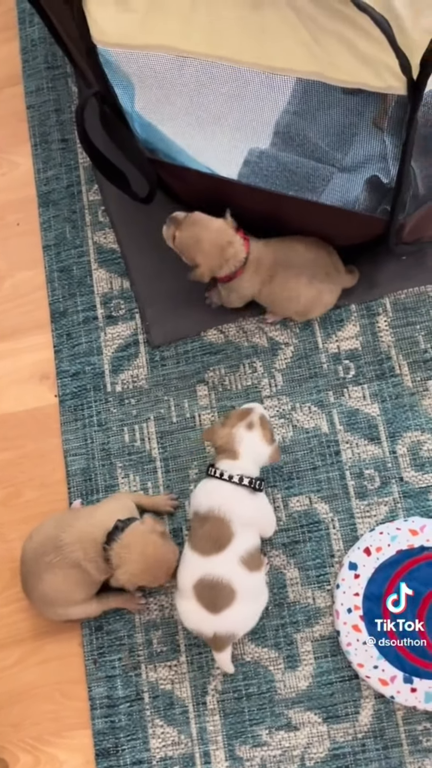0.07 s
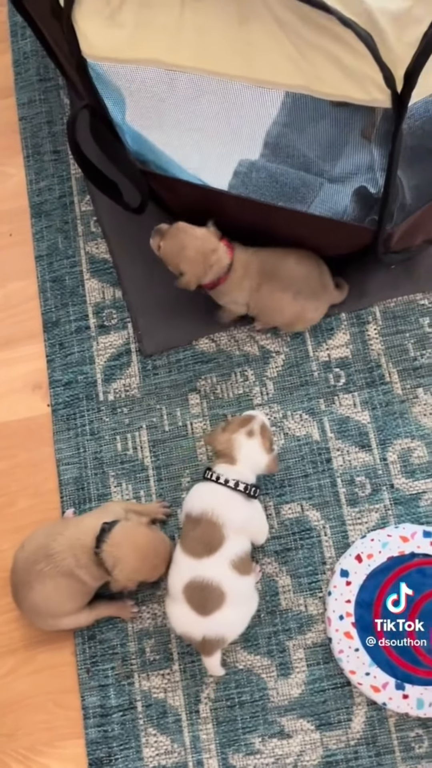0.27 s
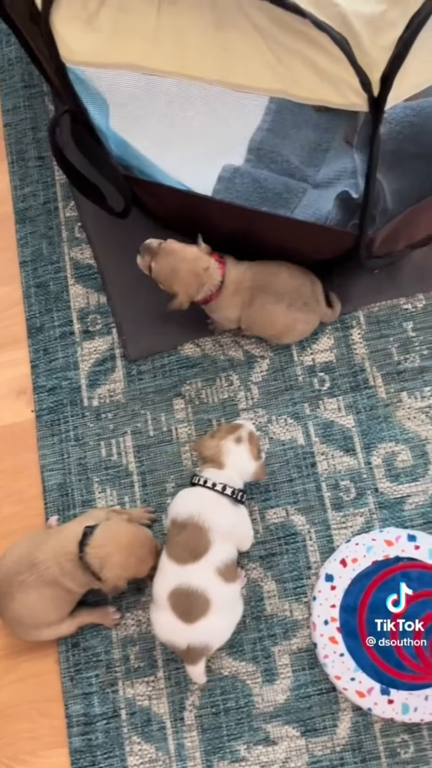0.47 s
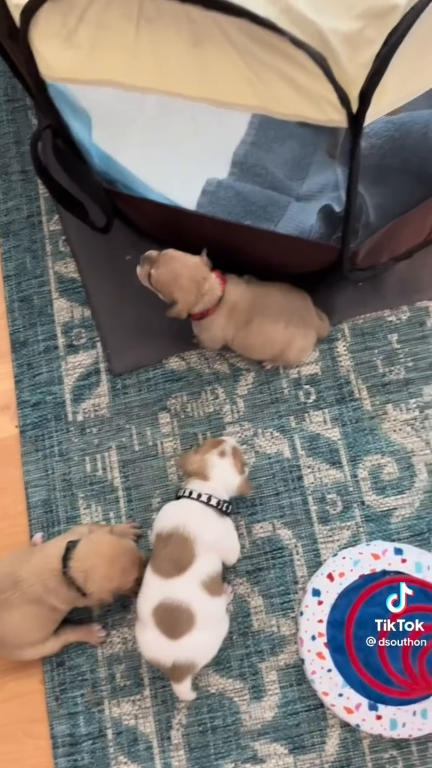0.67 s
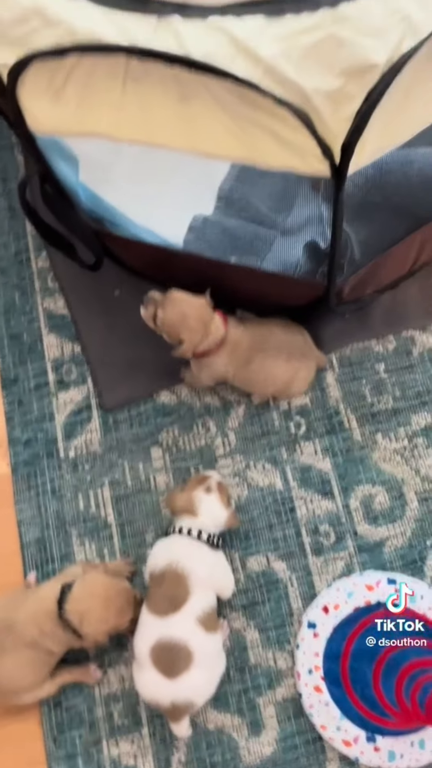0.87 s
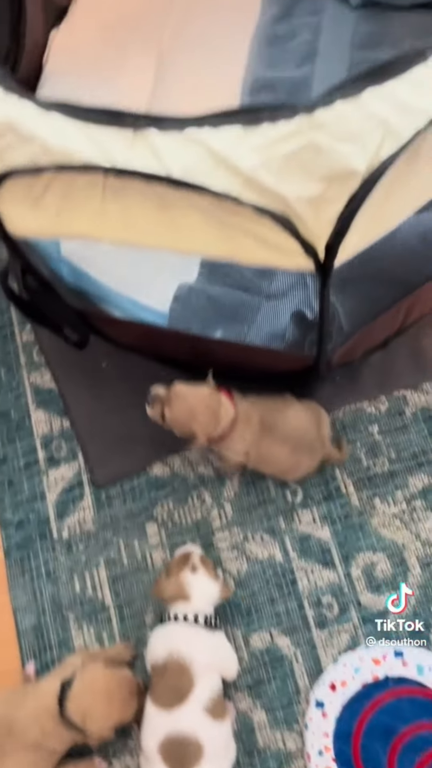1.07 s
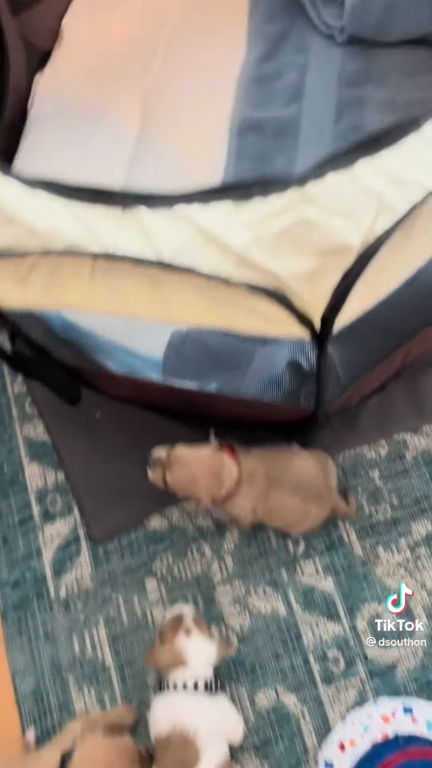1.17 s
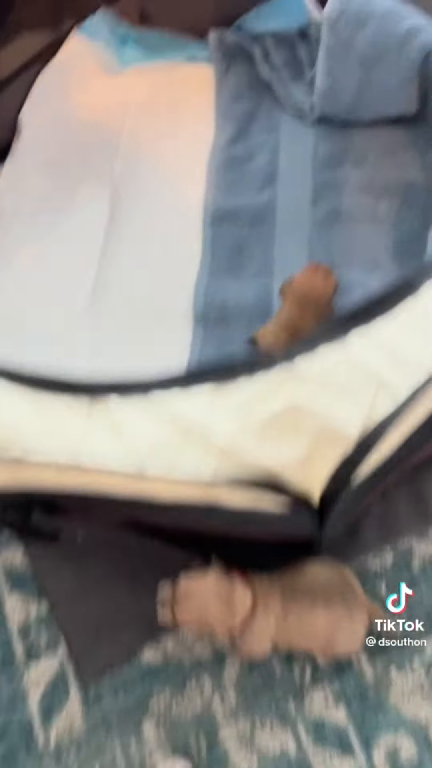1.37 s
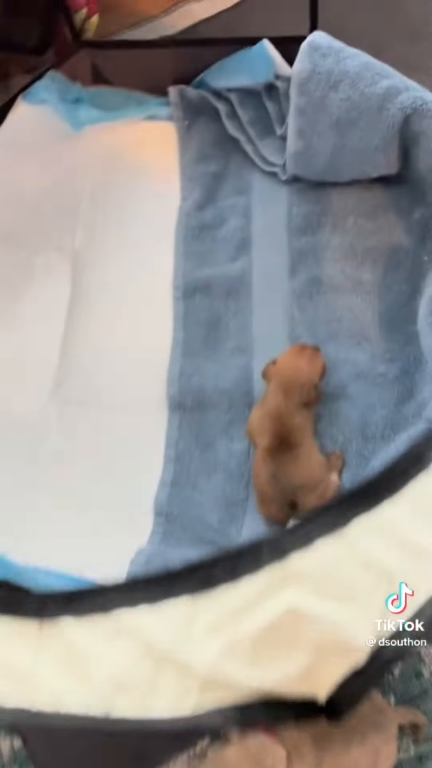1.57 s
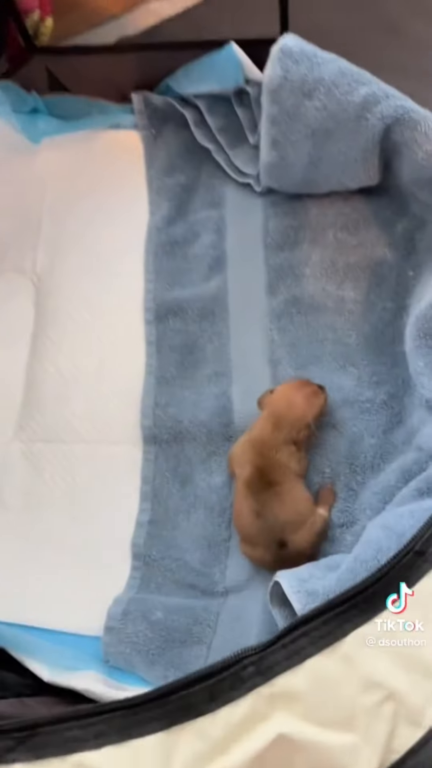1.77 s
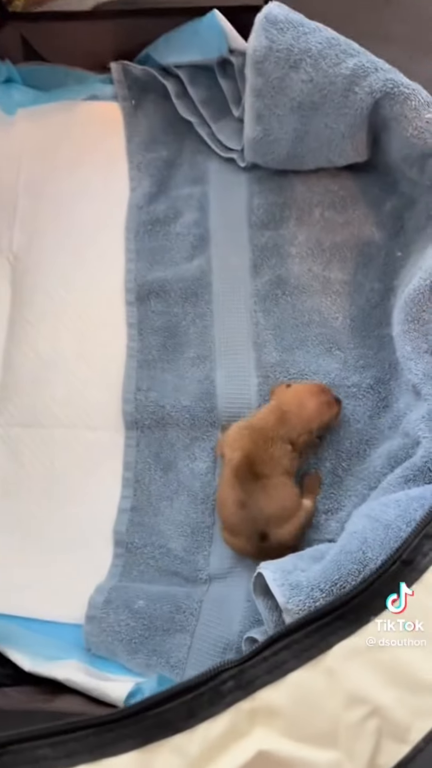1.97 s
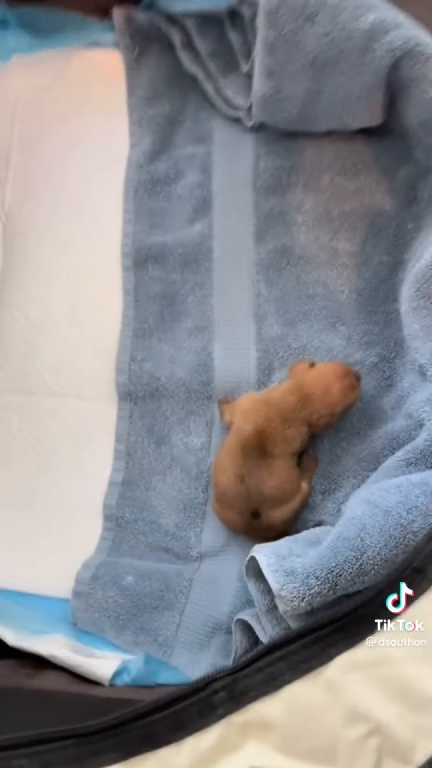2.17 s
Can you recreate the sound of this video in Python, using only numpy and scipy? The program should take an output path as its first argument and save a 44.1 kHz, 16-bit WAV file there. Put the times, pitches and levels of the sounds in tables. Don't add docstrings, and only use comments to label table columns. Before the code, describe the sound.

Three young puppies cry over one another: the loudest gives sharp rising yelps that break into raspy squeals and thin whistling whimpers, while two others whine softly; small furnished room, phone close by, low house hum.

```python
import sys
import numpy as np
from scipy import signal
from scipy.fft import rfft, irfft, next_fast_len
from scipy.io import wavfile
from scipy.ndimage import uniform_filter1d

SR = 44100
rng = np.random.default_rng(int(sys.argv[2]) if len(sys.argv) > 2 else 0)


def transcribe(signal):
    frames = np.atleast_2d(signal).T
    limited = np.clip(frames, -1, 1)
    pcm = np.round(limited * 32767).astype(np.int16)
    wavfile.write(sys.argv[1], SR, pcm)


def field_ratio(decibels):
    return 10 ** (np.asarray(decibels, dtype=float) / 20)


N = 97020
BAND_TOP_HZ = 13200


def evened(x):
    return x / np.sqrt(np.mean(x ** 2) + 1e-20)


def read(points, hz):
    f, value = np.transpose(points)
    return np.interp(np.log(hz + 1), np.log(f + 1), value)


def add(mix, start_s, sound):
    part = mix[round(start_s * SR):][:len(sound)]
    part += sound[:len(part)]


def drift(n, size):
    return evened(uniform_filter1d(uniform_filter1d(rng.standard_normal(n), size), size))


def resonate(x, hz, width_hz):
    turn = np.exp(2j * np.pi * np.cumsum(hz * np.ones(len(x))) / SR)
    r = np.exp(-np.pi * width_hz / SR)
    return 2 * (turn * signal.lfilter([1 - r], [1, -r], x / turn)).real


def controls(table):
    edge_s = .008
    rows = np.array(table, float)
    t = np.arange(rows[0, 0], rows[-1, 0], 1 / SR)
    rise = t - t[0] + (t[0] < .002)
    fall = t[-1] - t + (t[-1] > N / SR - .002)
    edge = np.clip(np.minimum(rise, fall) / edge_s, 0, 1)
    columns = [np.interp(t, rows[:, 0], c) for c in rows.T[1:]]
    return t[0], edge, [uniform_filter1d(c, size=400, mode="nearest") for c in columns]


def rattle(table, upper=()):
    # frequency in Hz, width in Hz, level in dB.
    fixed_rings = [(343, 250, -40), (1500, 220, -21), (8500, 500, -24), (10400, 1500, -36)]
    first_width_hz, air, upper_lag_s = 310, .45, .003
    start, edge, (rate, db, ring_hz, rough) = controls(table)
    n = len(rate)
    turns = np.cumsum(rate * (1 + .25 * rough * drift(n, size=120))) / SR
    slaps = np.diff(np.floor(turns), prepend=-1) * field_ratio(4 * rough * drift(n, size=60))
    puff = np.exp(-3 * (turns % 1))
    drive = (1 - .7 * np.minimum(rough, 1)) * evened(slaps)
    drive = drive + 1.6 * rough * (.2 + puff) * rng.standard_normal(n)
    first = drive
    for width_hz in (first_width_hz, 600, 800):
        first = resonate(first, ring_hz, width_hz)
    airy = drive + air * (.5 + puff) * rng.standard_normal(n)
    late = np.roll(airy, round(upper_lag_s * SR))
    rings = [(airy, hz, width, g) for hz, width, g in fixed_rings]
    rings += [(late, np.linspace(hz, end_hz, n), width, g) for hz, end_hz, width, g in upper]
    sound = evened(first)
    for source, hz, width, ring_db in rings:
        ring = resonate(source, hz, width)
        ring = resonate(resonate(ring, hz, 2 * width), hz, 2 * width)
        sound = sound + field_ratio(ring_db) * evened(ring)
    steady = sound / np.sqrt(uniform_filter1d(sound ** 2, size=900) + 1e-3)
    return start, np.sqrt(edge) * field_ratio(db) * steady


def whine(table, open_db, throat, order, breath_db, flutter_db, blur_db):
    wobble = .0015
    effort_tilt = 0.36
    onset_air_db, onset_air_s = 14, .035
    start, edge, (hz, db) = controls(table)
    n, k = len(hz), np.arange(1, 21)[:, None]
    hz = hz * (1 + wobble * drift(n, size=150))
    tilt_db = open_db + effort_tilt * (db - db.max())
    gain_db = read(throat, k * hz) - read(throat, order * hz) + tilt_db * np.log2(k / order)
    onset_db = onset_air_db * np.exp(-np.arange(n) / SR / onset_air_s) * (start > 0)
    flutter = []
    for i in range(20):
        sway = field_ratio(flutter_db * min(i, 3) * drift(n, size=500))
        breath = field_ratio(breath_db + i + blur_db * min(i, 2) + onset_db) * drift(n, size=24)
        flutter.append(sway + breath)
    turns = k * np.cumsum(hz) / SR + rng.random((20, 1))
    parts = field_ratio(gain_db) * np.array(flutter) * (k * hz < BAND_TOP_HZ) * np.cos(2 * np.pi * turns)
    return start, np.sqrt(2) * edge * field_ratio(db) * parts.sum(0)


def calls(tables, opens, throats, **voice):
    out = np.zeros(N)
    for i, (table, open_db) in enumerate(zip(tables, opens)):
        add(out, *whine(table, open_db, throats[min(i, len(throats) - 1)], **voice))
    return out


def loud_pup():
    # time in s, pitch in Hz, level of partial 2 in dB.
    yelps = [
        [(0.185, 864.2, -41), (0.207, 945.3, -23), (0.223, 1066, -19), (0.233, 1140, -10)],
        [(0.695, 739.0, -44), (0.707, 767.3, -33.5), (0.729, 896.5, -18), (0.745, 929.1, -13),
         (0.763, 968.1, -15.5), (0.783, 1091, -21.5), (0.792, 1117, -27)],
        [(1.275, 723.4, -76), (1.289, 740.0, -38.5), (1.361, 1008, -19.5), (1.385, 1099, -15),
         (1.395, 1135, -29.5), (1.407, 1105, -21.5), (1.415, 1094, -24.5), (1.435, 1111, -27)],
    ]
    # time in s, pitch in Hz, level of partial 1 in dB.
    whistles = [
        [(0.272, 1904, -31), (0.278, 1919, -13), (0.302, 1892, -20.5), (0.34, 1868, -22.5),
         (0.348, 1835, -25.5), (0.438, 1716, -29), (0.498, 1636, -30), (0.52, 1490, -52.5)],
        [(0.885, 1628, -32), (0.917, 1414, -35.5), (0.95, 1431, -34.5), (0.965, 1383, -34.5),
         (0.995, 1350, -44.5)],
        [(0.975, 1629, -31.5), (1.055, 1714, -35.5), (1.09, 1733, -39)],
        [(1.455, 1361, -39), (1.497, 1488, -41.5), (1.625, 1570, -44)],
    ]
    # time in s, pulses per s, level in dB, first ring in Hz, roughness 0-1.
    rattles = [
        [(.232, 328, -13, 1950, .04), (.252, 352, -14, 2050, .05), (.262, 350, -19, 2050, .1),
         (.28, 320, -18, 2150, .06), (.298, 320, -19, 2200, .06), (.308, 320, -34, 2200, .3)],
        [(.788, 235, -19, 2100, .14), (.826, 235, -20, 2150, .16), (.848, 180, -20, 2050, .1),
         (.862, 110, -22, 2000, .1), (.885, 104, -23, 2050, .2), (.915, 100, -36, 2200, .6)],
        [(1.385, 250, -22, 2150, .4), (1.43, 230, -22, 2250, .5), (1.475, 210, -25, 2400, .6),
         (1.52, 200, -40, 2500, .9)],
    ]
    # start in Hz, end in Hz, width in Hz, level in dB.
    upper_rings = [
        [(4335, 4700, 67, -15), (5300, 5200, 340, -17), (3230, 2400, 810, -22), (6100, 9200, 500, -20.5)],
        [(4810, 5200, 180, -11), (5120, 5550, 280, -8.5), (3400, 2200, 500, -16.5), (4000, 3900, 430, -23)],
        [(3480, 2100, 440, -12), (4480, 5400, 960, -13), (5640, 5850, 290, -10.5), (6260, 3000, 250, -46)],
    ]
    # frequency in Hz, gain in dB.
    yelp_throats = [
        [(1000, -47.5), (2000, -4.5), (3100, -34.5), (4100, -26), (5300, -36), (6200, -37.5), (9000, -36),
         (13000, -43)],
        [(950, -39), (1900, 0), (2800, -30.5), (3700, -20), (4700, -25), (5600, -11.5), (6500, -41.5),
         (13000, -49)],
        [(900, -39), (1500, -13), (2200, 4.5), (2900, -22), (3700, -5), (5000, -20.5), (6100, -6), (12000, -37)],
    ]
    # frequency in Hz, gain in dB.
    whistle_throats = [
        [(1800, -2), (3600, -28.5), (5300, -22), (7000, -35.5), (8800, -29), (13000, -58)],
        [(1450, -1.5), (2850, 5), (4300, -13), (5700, -8.5), (7000, -16.5), (8600, -26.5), (13000, -50)],
        [(1650, -0.5), (3400, -14), (5100, -22), (6800, -22), (8500, -30), (13000, -72.5)],
        [(1450, 2), (3000, -0.5), (4400, -30), (5900, -16), (8000, -28), (13000, -55)],
    ]
    yelp_open = [0.1, 0.12, 0.1]
    whistle_open = [0.1, 0.1, 0.1, 0.1]
    out = calls(yelps, yelp_open, yelp_throats, order=2, breath_db=-33, flutter_db=.5, blur_db=3)
    out = out + calls(whistles, whistle_open, whistle_throats,
                      order=1, breath_db=-33, flutter_db=2.5, blur_db=12)
    for table, upper in zip(rattles, upper_rings):
        add(out, *rattle(table, upper))
    return out


def earlier_yelp():
    # time in s, pulses per s, level in dB, first ring in Hz, roughness.
    ringing = [
        (0, 580, -35, 1666, 1.1),
        (.02, 1200, -52.5, 1410, 1.3),
    ]
    out = np.zeros(N)
    add(out, *rattle(ringing))
    return out


def arc(row, low, rise_s, drop, drop_s, swell_db):
    start, length, top_hz, climb, db = row
    t = np.linspace(max(-start, 0), length, 60)
    late = np.exp(-t / rise_s)
    end = np.clip(1 - (length - t) / drop_s, 0, 1)
    hz = (top_hz + climb * t) * (1 - (1 - low) * late) * (1 - drop * end ** 2.4)
    return np.transpose([start + t, hz, db - swell_db * late - 6 * end ** 2])


def middle_pup():
    # start in s, length in s, plateau in Hz, climb in Hz per s, level in dB.
    far_whines = [
        (-.2, 0.33, 886.6, 393, -44),
        (0.292, 0.3, 959, 56, -46),
        (0.731, 0.31, 867, 207, -45),
    ]
    # time in s, pitch in Hz, level of partial 1 in dB.
    near_whines = [
        [(1.183, 467, -57), (1.233, 756.6, -46.5), (1.3, 897.6, -40), (1.34, 924, -42.5), (1.4, 1000, -40.5),
         (1.5, 1068, -56.5)],
        [(1.64, 464, -61), (1.66, 532, -49), (1.68, 670, -46), (1.696, 746.6, -45.5), (1.734, 826.4, -39.5),
         (1.77, 890, -38.5), (1.804, 918.0, -37.5), (1.922, 973, -42), (1.95, 1020, -42)],
        [(1.935, 959, -39.5), (1.978, 1185, -37.5), (2.055, 1060, -54)],
        [(2.14, 608, -61), (2.158, 557.5, -51), (2.18, 655, -46), (2.2, 724, -42.5)],
    ]
    far_open = [0, 0, 0]
    near_open = [1, 0.32, -13.5, 1.33]
    # frequency in Hz, gain in dB.
    far_throat = [(900, -4.5), (1900, -8), (2850, -15), (3800, -29), (5500, -36), (8000, -34.5),
                  (13000, -41)]
    # frequency in Hz, gain in dB.
    near_throats = [
        [(700, -10), (2600, -1), (3500, -19.5), (4500, -0.5), (5200, -3), (5900, -2), (7500, -36.5),
         (12000, -25.5)],
        [(700, -14), (2500, 1), (3600, -16), (4700, -0.5), (5600, -4), (7500, -33), (10500, -21),
         (13500, -22.5)],
    ]
    # frequency in Hz, gain in dB.
    last_throat = [(600, -10), (1300, 4), (2000, -9.5), (2700, -13.5), (4000, -24), (5500, -17.5),
                   (12000, -39.5)]
    far = [arc(r, low=.64, rise_s=.07, drop=0.032, drop_s=0.005, swell_db=13.0) for r in far_whines]
    blurred = calls(far + near_whines[:1], far_open + near_open, [far_throat] * 3 + near_throats[:1],
                    order=1, breath_db=-33, flutter_db=1.3, blur_db=5)
    clean = calls(near_whines[1:], near_open[1:], near_throats[1:] * 2 + [last_throat],
                  order=1, breath_db=-39, flutter_db=.5, blur_db=0)
    return blurred + clean


def low_pup():
    # start in s, length in s, plateau in Hz, climb in Hz per s, level in dB.
    whines = [
        (-.15, 0.33, 780.3, 274, -37.5),
        (0.379, 0.28, 783.2, -130, -43.5),
        (0.859, 0.25, 750.8, 170, -45),
        (1.309, .255, 735, 322.5, -42.5),
        (1.764, .293, 747.7, 38, -43.5),
    ]
    mouth_open = [0, 0.93, 3, 2, 5]
    # frequency in Hz, gain in dB.
    throat = [(500, -11), (800, 0), (1600, -5), (2400, -8.5), (3100, -35.5), (6000, -38.5), (13000, -53)]
    arcs = [arc(r, low=0.61, rise_s=0.038, drop=0.41, drop_s=0.01915, swell_db=21.5) for r in whines]
    return calls(arcs, mouth_open, [throat], order=1, breath_db=-33.0, flutter_db=1.87, blur_db=7)


def rustles():
    # start in s, length in s, level in dB.
    drags = [
        (1.02, .25, -58),
        (1.36, .14, -59),
        (.78, .1, -62),
    ]
    rub_hz, rub_width_hz = 364, 310
    fizz_hz, fizz_width_hz, fizz_db = 4200, 2500, 2
    out = np.zeros(N)
    for start, length, db in drags:
        n = round(length * SR)
        noise = rng.standard_normal(N // 6)[:n] * field_ratio(2.3 * drift(N // 6, size=300)[:n])
        rub = resonate(resonate(noise, rub_hz, rub_width_hz), rub_hz, rub_width_hz)
        fizz = resonate(resonate(noise, fizz_hz, fizz_width_hz), fizz_hz, fizz_width_hz)
        scrape = evened(rub) + field_ratio(fizz_db) * evened(fizz)
        add(out, start, field_ratio(db) * scrape * np.hanning(n) ** .5)
    return out


def room(x):
    # frequency in Hz, t60 in s.
    decay = [(300, 0.5), (1300, 0.43), (2250, 0.32), (3500, 0.52), (5300, 0.27), (9000, 0.066)]
    taps = np.zeros((2, SR // 2))
    slots = np.arange(160, SR // 2 - 20, 20)
    at = slots + rng.integers(0, 20, (2, len(slots)))
    np.put_along_axis(taps, at, rng.choice([-1., 1.], at.shape), 1)
    taps[1] = 0.85 * taps[0] + 0.78 * taps[1]
    hz, t, z = signal.stft(taps, SR, nperseg=256)
    tail = signal.istft(z * field_ratio(-60 * t / read(decay, hz)[:, None]), SR, nperseg=256)[1]
    return signal.fftconvolve(x[None], tail / np.linalg.norm(tail[0]), axes=1)[:, :N]


def house():
    # frequency in Hz, level in dB per Hz.
    hum = [(15, -67), (25, -25), (108, -0.5), (190, -10.5), (248, -3), (399, -11), (500, -6), (650, -18),
           (1100, -120)]
    # frequency in Hz, level in dB per Hz.
    hiss = [(1500, -15.5), (6000, -18), (14000, -39.5)]
    floor_db, growth_db_per_s = -63, 4.1
    frames, hz = N // 512 + 5, np.fft.rfftfreq(2048, 1 / SR)
    a, b, c, d, patches = rng.standard_normal((frames, 1025, 5)).T
    patches = uniform_filter1d(uniform_filter1d(patches, size=8, axis=0), size=8, axis=1)
    left = a + 1j * b
    z = np.array([left, 0.86 * left + 0.45 * (c + 1j * d)])
    growth_db = growth_db_per_s * np.arange(frames) * 512 / SR
    z = z * field_ratio(read(hum + hiss, hz)[:, None] + 0.95 * evened(patches) + growth_db)
    return field_ratio(floor_db) * evened(signal.istft(z, nperseg=2048, noverlap=1536)[1][:, :N])


def scene():
    # time in s, left minus right in dB.
    swing = [
        (0, 1.3),
        (.6, .4),
        (1., 0),
        (1.25, -2.4),
        (1.5, -2.6),
        (1.8, -1),
        (2.2, -.8),
    ]
    loud, before, mid, low = loud_pup(), earlier_yelp(), middle_pup(), low_pup()
    sides = np.array([[1], [-1]])
    dry = loud * field_ratio(.2 * sides) + mid * field_ratio(-.7 * sides) + low * field_ratio(-.6 * sides)
    wet = room(field_ratio(-15) * loud + field_ratio(-16) * mid + field_ratio(-10.0) * low + before)
    swing_db = np.interp(np.arange(N) / SR, *np.transpose(swing))
    return field_ratio(swing_db * .5 * sides) * (dry + wet) + rustles() + house()


def roll_off(x):
    return signal.sosfilt(signal.butter(12, 13140, fs=SR, output="sos"), x)


def record(dry):
    # frequency in Hz, phase by which left leads in radians.
    port_turn = [(300, .2), (1800, .35), (2400, .95), (5200, .8), (6300, 2.4), (8000, 3.4), (10000, 5.6),
                 (13000, 8)]
    # frequency in Hz, gain in dB.
    port_dip = [(6300, 1), (6900, -3.5), (7300, -9.5), (8100, -1), (8500, -2.5)]
    size = next_fast_len(N + 4096)
    hz = np.fft.rfftfreq(size, 1 / SR)
    ports = rfft(dry, size) * np.exp(.5j * read(port_turn, hz) * np.array([[1], [-1]]))
    ports = ports + (field_ratio(read(port_dip, hz)) - 1) * ports.mean(0)
    edge = np.where(hz < BAND_TOP_HZ, 1, field_ratio(-6))
    return roll_off(irfft(ports * edge, size)[:, :N])


dry = scene()
out = record(dry)
transcribe(out)
```